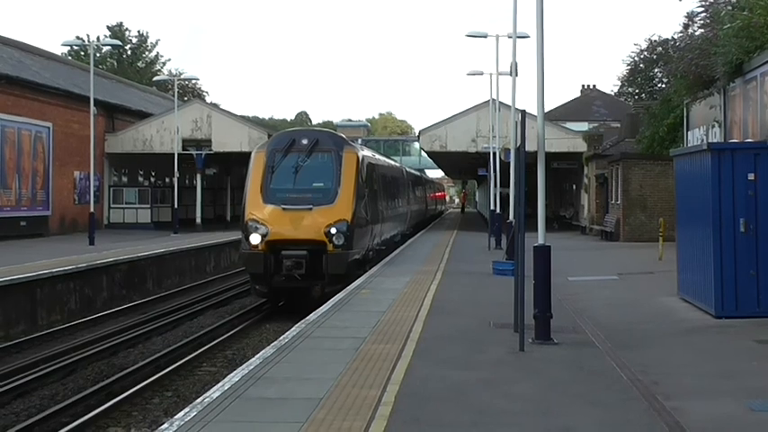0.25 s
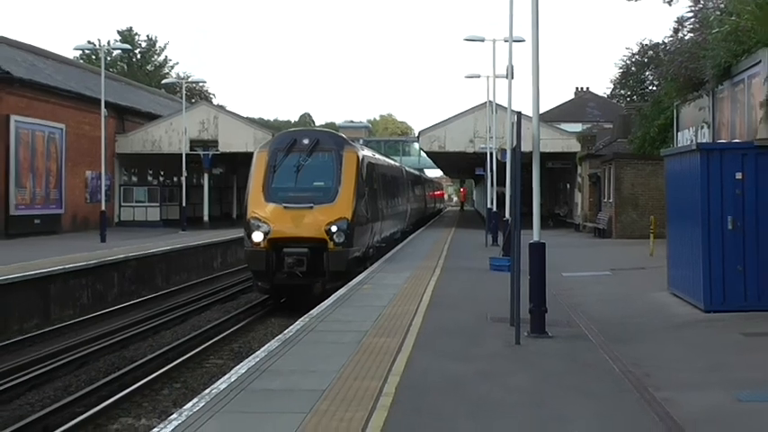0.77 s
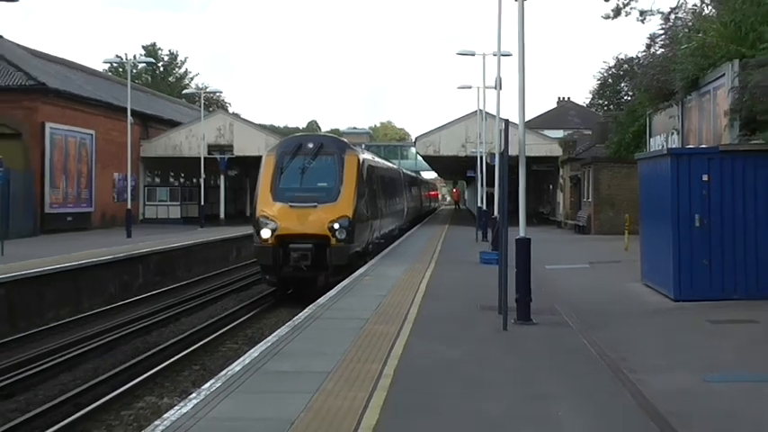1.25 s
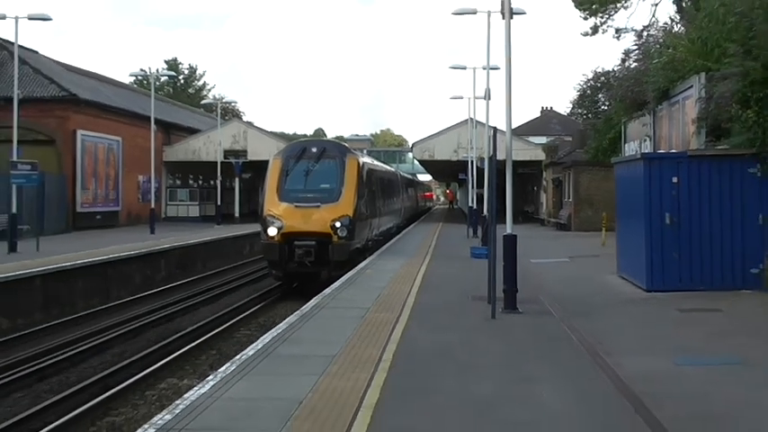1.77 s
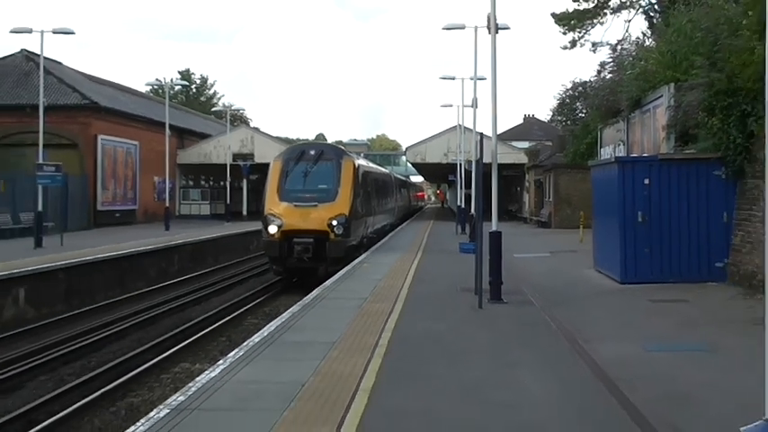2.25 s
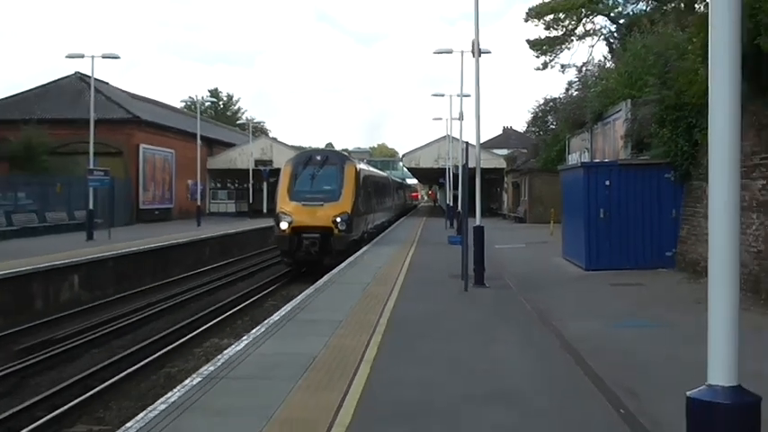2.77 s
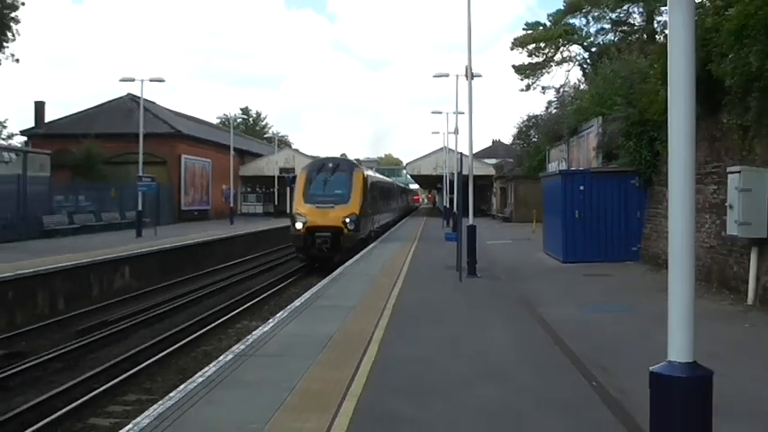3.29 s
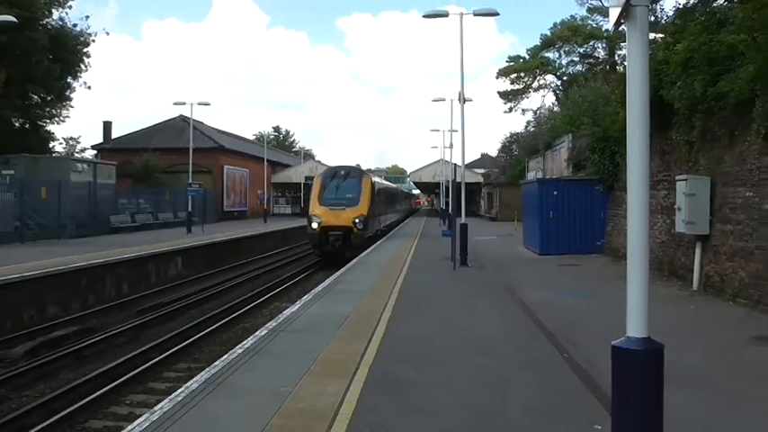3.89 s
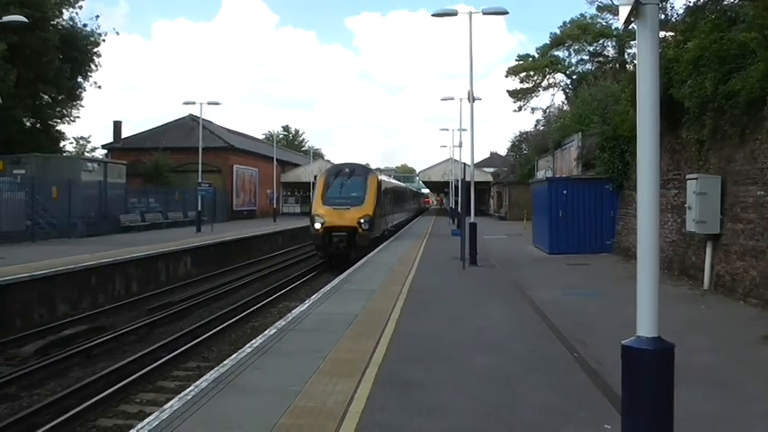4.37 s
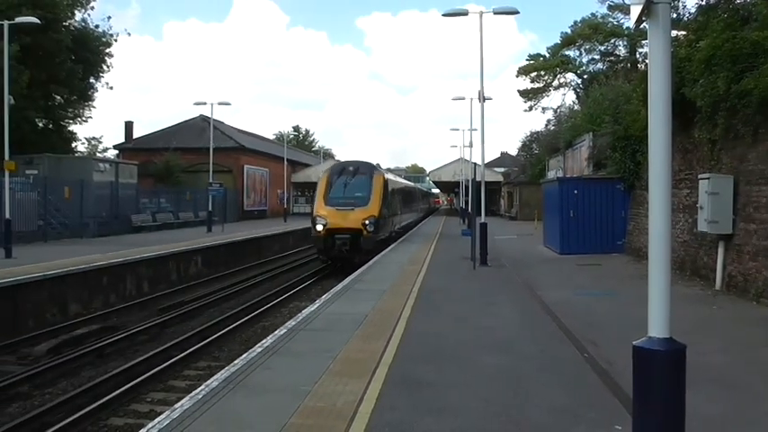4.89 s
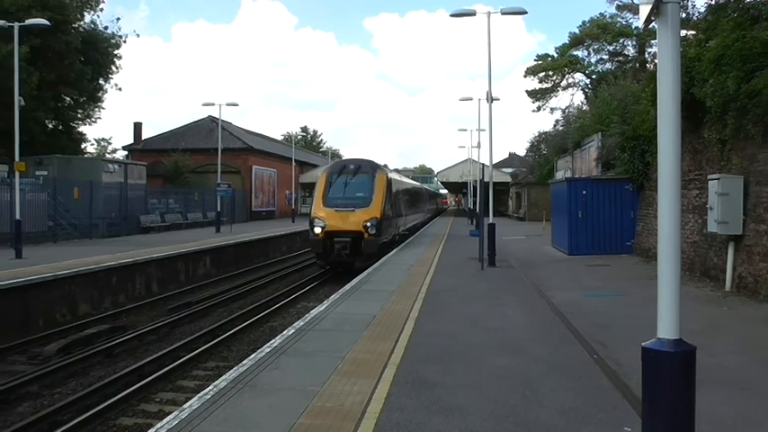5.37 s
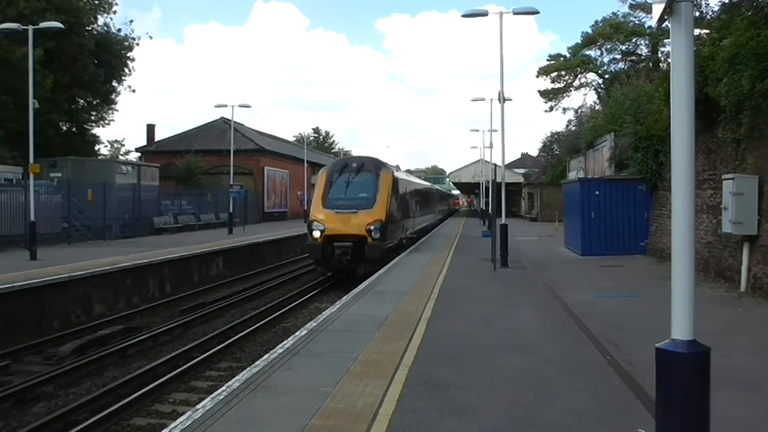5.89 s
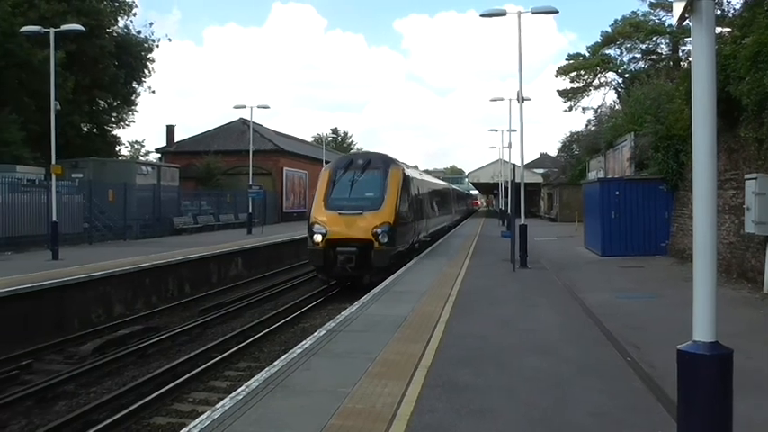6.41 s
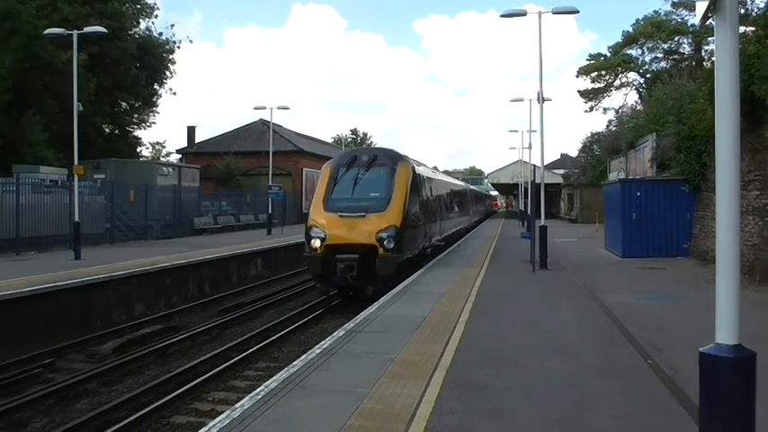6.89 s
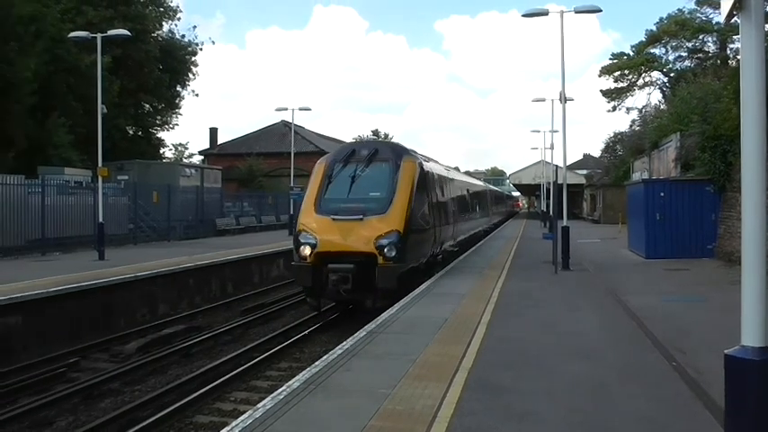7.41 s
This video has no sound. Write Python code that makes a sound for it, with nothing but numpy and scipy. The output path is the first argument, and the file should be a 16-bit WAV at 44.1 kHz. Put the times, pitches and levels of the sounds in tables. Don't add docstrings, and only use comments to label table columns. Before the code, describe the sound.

Outdoors on a station platform, a diesel train of several cars starts with a low engine murmur, steady hollow cooling-fan noise and a thin turbocharger whistle around 4 kHz, with a soft wind rumble. From about 1 s the revs climb smoothly; the firing drone rises in pitch and booms swell and cancel as the cars drift in and out of step. Wind thuds softly near 2.3 s, and gentle compressed-air hisses come and go. A small plastic click from the camera sounds at 3.2 s. Around 3.8 s a second, lower whistle and alternator singing join, with a strong boom near 4 s. A fainter tick comes at 5.2 s. From 6 s the exhaust grows rougher and louder, with broader air hiss and another wind thud near 7 s. The train keeps approaching, roaring loudest as the sound stops at about 7.6 s, before passing.

```python
import sys
import numpy as np
from scipy import signal
from scipy.fft import rfft, irfft, next_fast_len
from scipy.io import wavfile
from scipy.ndimage import uniform_filter1d

SR = 44100
rng = np.random.default_rng(int(sys.argv[2]) if len(sys.argv) > 2 else 0)


def to_linear_factor(level_db):
    exponent = np.asarray(level_db, float) / 20
    return 10 ** exponent


def output_pcm(signal):
    pcm = np.clip(np.atleast_2d(signal).T, -1, 1) * 32767
    wavfile.write(sys.argv[1], SR, np.round(pcm).astype(np.int16))


N = 337365
T = np.arange(N) / SR
PAD = 4096
SIZE = next_fast_len(N + 2 * PAD)
HZ = np.maximum(np.arange(SIZE // 2 + 1) * SR / SIZE, 1)


def curves(table):
    seconds, *columns = np.transpose(table)
    return [np.interp(T, seconds, column) for column in columns]


def response(points, hz=HZ):
    table_hz, table_db = np.array(points).T
    return np.interp(np.log(hz), np.log(table_hz), table_db)


def bumps(modes):
    return sum(db * np.exp(-2 * ((HZ - centre) / width) ** 2) for centre, width, db in modes)


def filtered(x, gain):
    padded = np.pad(x, (PAD, SIZE - N - PAD), "reflect")
    return irfft(rfft(padded) * gain, SIZE)[PAD:PAD + N]


def late(x, seconds):
    return np.pad(x, (int(seconds * SR), 0), "reflect")[:N]


def walk(rate):
    hold = max(int(SR / rate), 1)
    steps = np.repeat(rng.standard_normal(N // hold + 1), hold)
    return 1.46 * uniform_filter1d(uniform_filter1d(steps, hold), hold)[:N]


def swells(rows, rest_db):
    roundness = 1.32
    coarse = T[::64]
    start, length, db = np.transpose(rows)[:, :, None]
    progress = np.clip((coarse - start) / length, 0, 1)
    arch = np.sin(np.pi * progress).clip(0) ** roundness
    power = (to_linear_factor(db) ** 2 * arch).sum(axis=0) + to_linear_factor(rest_db) ** 2
    return np.interp(T, coarse, 10 * np.log10(power))


# frequency in Hz, side level minus mid level in dB.
WIDTH = [(60, -11), (110, -15), (200, -14.5), (370, -18.5), (690, -11), (1260, -11), (2320, -9),
         (4270, -11.5), (7850, -11), (14400, 6)]


def noise(gain):
    mid, side = rng.standard_normal((2, N))
    mid = filtered(mid, gain)
    side = filtered(side, gain * to_linear_factor(response(WIDTH)))
    return np.array([mid, side]) / np.std(mid)


def wavering(hz, db, smear_hz):
    speed = hz * (1 + .004 * walk(8))
    swirl = walk(smear_hz) + 1j * walk(smear_hz)
    tone = np.real(swirl * np.exp(2j * np.pi * np.cumsum(speed) / SR))
    return to_linear_factor(db + 1.2 * walk(5)) * tone


def lines(turns, orders, dbs, wobble):
    out = 0
    for order, db in zip(orders, dbs):
        phase = 2 * np.pi * order * turns + 6.0 / order + wobble * walk(1.6)
        out = out + np.sqrt(2) * to_linear_factor(db) * np.cos(phase)
    return out


# start in seconds, length in seconds, peak level in dB.
WIND_GUSTS = [
    (-.8, 2.2, -48),
    (1.68, .36, -53),
    (2.15, .3, -47),
    (2.4, .55, -46),
    (4, .5, -53),
    (6.95, .4, -45),
    (7.4, .6, -52),
]


def wind():
    band = 1 / (1 + (HZ / 62) ** 6) / (1 + (35 / HZ) ** 4)
    thud = noise(band) * np.array([[1], [2.0]])
    return thud * to_linear_factor(swells(WIND_GUSTS, -66) + 2.0 * walk(7.1))


# time in seconds, peak level in dB.
BODY_TICKS = [
    (3.2462, -23.5),
    (5.1525, -36),
]


def ticks():
    out = np.zeros(N)
    t = np.arange(300) / SR
    for seconds, db in BODY_TICKS:
        start = int(seconds * SR)
        out[start:start + len(t)] = to_linear_factor(db + 6.0) * rng.standard_normal(len(t)) * np.exp(-t / .0015)
    return filtered(out, 1 / (1 + (3000 / HZ) ** 2) / (1 + (HZ / 5500) ** 3))


# start in seconds, length in seconds, peak level in dB.
BLOWS = [
    (1.3, 1.6, -53.5),
    (2.4, 1.43, -49.5),
    (3.7, 1.2, -47),
    (5.7, 1.3, -47.5),
    (6.7, 2, -44),
]


def air():
    centre_hz, width_octaves = 7500, 0.98
    hump = np.exp(-.5 * (np.log2(HZ / centre_hz) / width_octaves) ** 2)
    return noise(to_linear_factor(response(GAS_COLOUR)) * hump) * to_linear_factor(swells(BLOWS, -69))


# frequency in Hz, level in dB per Hz.
COOLING_COLOUR = [(160, -41), (280, 1), (453, 1.5), (632, -13), (839, -9), (1130, -18.5), (1710, -11),
                  (1860, -21), (2430, -24.5), (4800, -22), (8740, -44.5), (13700, -69), (14900, -69.5)]
# frequency in Hz, width in Hz, boost in dB.
DUCT_RINGS = [(372.6, 27.5, 6.5), (855, 56, 5.5), (761, 124, 8.5), (1056, 35, 16.5), (1630, 116, 6),
              (1733, 49, 7), (3230, 610, 6.5), (5020, 47, 8.5), (5370, 51, 14)]
# frequency in Hz, smear in Hz, level in dB.
BLADE_TONES = [(780.5, 40, -51), (851.5, 30, -48.5), (1680, 60, -47.5), (1745, 50, -49), (3340, 300, -62),
               (4690, 120, -63)]


def fans():
    start_m, pull_m_s2 = 29, 0.46
    nearness = start_m / (start_m - pull_m_s2 * T ** 2 / 2)
    colour = to_linear_factor(response(COOLING_COLOUR) + bumps(DUCT_RINGS)) / (1 + (260 / HZ) ** 4)
    cooling = noise(colour) * to_linear_factor(-37 + .5 * walk(1.8))
    blades = sum(wavering(hz, db, smear_hz) for hz, smear_hz, db in BLADE_TONES) * to_linear_factor(-0.95)
    return (cooling + np.array([blades, 0.18 * late(blades, .011)])) * nearness


# start in seconds, length in seconds, peak level in dB.
FAN_BEATS = [(.08, 0.42, -38.5), (1.27, 0.11, -39), (1.7, 0.13, -39.5), (2.05, .15, -36),
             (2.333, 0.16, -32), (2.71, .12, -32.5), (3.45, 0.35, -39), (4.0, 0.14, -37),
             (4.263, 0.12, -34), (4.804, 0.15, -35), (5.16, 0.11, -37), (5.7, 0.23, -37), (6.04, .16, -34),
             (6.697, .25, -37), (7.47, .166, -35)]


def hum():
    pitch_hz, rest_db, flank_s = 382, -53.5, .04
    rows = np.array(FAN_BEATS) + [-flank_s, 2 * flank_s, 0]
    phase = 2 * np.pi * np.cumsum(pitch_hz * (1 + .012 * walk(6))) / SR
    return np.sqrt(2) * to_linear_factor(swells(rows, rest_db) - 2.5) * np.cos(phase)


SLOT_ORDERS = (42, 56, 84)
# start in seconds, length in seconds, peak level in dB.
SLOT_SONGS = [
    [(3.9, 0.38, -40.5), (4.35, 0.42, -41.5), (4.8, 0.22, -44), (5.6, 2.2, -44)],
    [(4.3, 0.98, -46), (5.4, 2.55, -45)],
    [(3.7, 1.1, -55.5), (4.8, 0.99, -54), (6.8, 1.8, -50)],
]
SLOT_REST = (-52.5, -55.5, -67)


def alternator(turns):
    return lines(turns, SLOT_ORDERS, map(swells, SLOT_SONGS, SLOT_REST), 6.06)


# time in seconds, pitch in Hz, level in dB.
NEAR_WHISTLE = [(0, 4250, -57), (.55, 4530, -56), (.9, 4720, -58.5), (1.2, 4900, -64), (1.8, 5500, -65),
                (2.4, 5950, -58.5), (3, 6450, -63), (3.5, 6800, -60), (4.2, 7220, -59), (4.8, 7520, -59.5),
                (5.3, 7750, -65), (7.65, 8600, -66)]
# time in seconds, pitch in Hz, level in dB.
FAR_WHISTLE = [(3.3, 4150, -75), (3.85, 4320, -53), (4.4, 4520, -55), (4.7, 4640, -52), (5.1, 4740, -54),
               (5.4, 4810, -55), (6, 4960, -53), (6.4, 5050, -55), (7.65, 5350, -55)]


def turbochargers():
    near = wavering(*curves(NEAR_WHISTLE), smear_hz=280)
    far = wavering(*curves(FAR_WHISTLE), smear_hz=150)
    return near + far


# time in seconds, crankshaft turns per second in Hz.
CRANK_SPEED = [(0, 18.7), (.66, 20.1), (1.23, 21.05), (1.6, 22), (2.17, 23), (2.8, 24.2), (3.4, 25),
               (4.1, 25.75), (4.75, 26.5), (5.6, 27.4), (6.3, 27.9), (7.1, 28.2), (7.65, 28.5)]


def crankshaft():
    inertia = int(.3 * SR)
    speed = curves(CRANK_SPEED)[0]
    for _ in range(2):
        speed = uniform_filter1d(speed, inertia, mode="nearest")
    return speed


# time in seconds, level over idle in dB.
EFFORT = [(0, -0.5), (.6, 0.8), (1.3, -0.5), (1.9, 1.5), (2.4, 1.5), (2.9, 2), (3.5, 3.5), (4.2, 5),
          (5.1, 6.5), (6.3, 7.5), (6.8, 9), (7.3, 9), (7.55, 10), (7.65, 11)]


def engine_load():
    return curves(EFFORT)[0]


# frequency in Hz, level in dB per Hz.
GAS_COLOUR = [(160, -26), (280, -5), (304, -3), (461, -3), (710, -14.5), (839, -12), (974, -15.5),
              (1400, -17.5), (1710, -16), (1860, -21), (2600, -27.5), (5220, -27.5), (7650, -37),
              (9040, -37), (14900, -69.5)]
GAS_SPLITS = (880, 2320)
# idle level in dB, dB per dB of load,
# dB per octave of turbo speed, depth of puffing from 0 to 1.
GAS_BANDS = [
    (-37.5, 1.2652, 0, 0.01),
    (-38.5, 1.1144, -1, 0),
    (-48, .5, 4.5, 0.04),
]
# frequency in Hz, level in dB per Hz.
RUMBLE_COLOUR = [(12, -58.5), (20, -37.5), (58, -11.5), (101, -15.5), (136, -3), (183, -0.5), (237, 2.5),
                 (320, -11.5), (420, -50), (700, -120)]


def roar(turns, load_db):
    low, high = (1 / (1 + (HZ / split) ** 8) for split in GAS_SPLITS)
    turbo_octaves = np.log2(curves(NEAR_WHISTLE)[0] / NEAR_WHISTLE[0][1])
    out = 0
    for share, (db, growth, boost_db, depth) in zip((low, high - low, 1 - high), GAS_BANDS):
        band = noise(to_linear_factor(response(GAS_COLOUR)) * np.sqrt(share) / (1 + (260 / HZ) ** 4))
        level_db = db + growth * load_db + boost_db * turbo_octaves - 1.5 + 0.71 * walk(4.1)
        puffs = 1 + depth * np.cos(6 * np.pi * turns)
        out = out + band * to_linear_factor(level_db) * puffs
    rumble = noise(to_linear_factor(response(RUMBLE_COLOUR)) / (1 + (HZ / 330) ** 6))
    return out + rumble * to_linear_factor(-32 + 0.65 * load_db)


MAIN_ORDERS = (3, 6, 8, 9)
BRANCH_ORDERS = (5, 7, 10, 12)
# frequency in Hz, level in dB.
SILENCER_PASS = [(30, -31), (60, -20.5), (100, -10.5), (140, -3.5), (200, 2), (260, -8), (330, -10.5),
                 (450, -20)]


def uneven(shaft_hz, turns, load_db):
    out = 0
    for half in range(3, 32):
        order = half / 2
        if order in MAIN_ORDERS + BRANCH_ORDERS:
            continue
        whole_db = 3 * (half % 2 == 0)
        size = to_linear_factor(response(SILENCER_PASS, shaft_hz[::64] * order) + whole_db).repeat(64)[:N]
        phase = np.pi * half * turns + 12.0 / half + 1.2 * rng.standard_normal()
        out = out + size * (.3 + walk(7)) * np.cos(phase)
    return out * to_linear_factor(-42 + .5 * load_db)


# start in seconds, length in seconds, peak level in dB.
ORDER_3 = [
    (-.2, 1.4, -36),
    (.71, 1.18, -35),
    (1.88, .63, -34.5),
    (2.54, .6, -29),
    (2.85, 1.13, -25.5),
    (3.75, 1.72, -25),
    (5.3, .86, -35),
    (6.15, 0.6, -36.5),
    (6.68, 0.52, -33.5),
    (7.2, 0.71, -33),
]
# start in seconds, length in seconds, peak level in dB.
ORDER_6 = [(-.1, 1.2, -31), (.49, 0.71, -35), (.85, 0.8, -30), (1.36, 0.7, -23.5), (1.97, .31, -19.5),
           (2.25, 0.21, -29), (2.43, 0.43, -20), (2.62, 0.473, -21.5), (3.14, 0.51, -25.5),
           (3.59, 0.31, -18), (3.8, 0.55, -13.5), (4.32, .19, -17), (4.45, 0.46, -18), (4.3, 1.17, -15),
           (5.36, 0.3, -20), (5.54, 0.45, -20), (5.98, 0.53, -24.5), (6.24, 0.36, -19.5), (6.5, 0.66, -13),
           (6.85, 0.47, -16), (7.1, 0.69, -12.5)]
# start in seconds, length in seconds, peak level in dB.
ORDER_8 = [(.03, .37, -32), (.44, 0.73, -31.5), (.88, .65, -38), (1.58, .45, -44), (1.97, .3, -27.5),
           (2.31, 0.35, -30.5), (2.58, 0.41, -31), (3.04, .7, -24.5), (3.93, 0.78, -21.5),
           (4.36, 0.54, -21), (4.63, 0.72, -28), (5.28, 0.52, -30), (5.72, 0.72, -29), (6.02, 1, -30),
           (6.79, 0.81, -24)]
# start in seconds, length in seconds, peak level in dB.
ORDER_9 = [(-.17, 0.44, -35.5), (.16, 0.75, -30), (.81, 0.72, -23.5), (1.549, .42, -24), (1.94, 0.34, -20),
           (2.261, .14, -25), (2.39, 0.13, -24.5), (2.54, 0.44, -23), (2.95, .25, -36), (3.19, 1, -29.5),
           (3.85, 0.61, -29.5), (4.4, 0.26, -24), (4.63, .23, -24.5), (4.8, .4, -25), (4.89, 0.89, -21),
           (5.87, 0.45, -24), (6.05, 0.49, -21), (6.57, 0.21, -25.5), (6.77, 0.22, -20.5),
           (6.96, 0.26, -25.5), (7.22, 1.3, -21.5)]
# start in seconds, length in seconds, peak level in dB.
ORDER_5 = [
    (2.58, 0.95, -38),
    (3.67, 0.74, -38),
    (4.14, 1, -41),
    (5.24, 0.95, -33),
    (6.19, 1.08, -29),
    (7.01, 0.85, -26),
]
# start in seconds, length in seconds, peak level in dB.
ORDER_7 = [
    (0.3, 0.39, -42),
    (0.93, 0.57, -39),
    (1.64, 2.47, -40.5),
    (3.93, 0.19, -36),
    (4.09, 0.88, -35),
    (5.19, 0.53, -32),
    (5.67, 0.57, -30.5),
    (6.23, 0.7, -25),
    (6.78, 0.29, -24.5),
    (6.94, 3.0, -23.5),
]
# start in seconds, length in seconds, peak level in dB.
ORDER_10 = [
    (-.06, .44, -37),
    (.36, 0.62, -32),
    (.92, 0.99, -37),
    (2.24, .31, -40),
    (2.61, .43, -32),
    (3.06, 0.4, -28.5),
    (3.2, 2.1, -32),
    (7.3, .9, -38),
]
# start in seconds, length in seconds, peak level in dB.
ORDER_12 = [
    (.03, .55, -34),
    (.6, .25, -33.5),
    (.91, 0.71, -26),
    (1.6, 1.1, -39),
    (2.86, 0.24, -42),
    (6.3, 1, -41),
]
# dB for each main order, then for each branch order.
MAIN_REST = (-55.5, -44.5, -51.5, -41.5)
BRANCH_REST = (-56.5, -47, -51, -45)


def exhaust(shaft_hz, turns, load_db):
    main_db = map(swells, (ORDER_3, ORDER_6, ORDER_8, ORDER_9), MAIN_REST)
    branch_db = map(swells, (ORDER_5, ORDER_7, ORDER_10, ORDER_12), BRANCH_REST)
    boom = lines(turns, MAIN_ORDERS, main_db, .45)
    lumps = lines(turns, BRANCH_ORDERS, branch_db, .6)
    return boom + lumps + uneven(shaft_hz, turns, load_db)


def scene():
    shaft_hz, load_db = crankshaft(), engine_load()
    turns = np.cumsum(shaft_hz) / SR
    pipes = exhaust(shaft_hz, turns, load_db)
    whine = turbochargers() + alternator(turns)
    mid, side = wind() + air() + fans() + roar(turns, load_db)
    mid = mid + ticks() + hum() + whine + pipes
    side = side + to_linear_factor(-32.5) * late(pipes, .066) + to_linear_factor(-12) * late(whine, 0.0076)
    return np.array([mid + side, mid - side])


# frequency in Hz, level in dB per Hz.
HISS_COLOUR = [(6000, -25.5), (10000, -12), (12000, -3.5), (15000, -6.5)]


def microphone_hiss():
    hiss = [filtered(port, to_linear_factor(response(HISS_COLOUR))) for port in rng.standard_normal((2, N))]
    hiss = np.array([port / np.sqrt(np.mean(port ** 2)) for port in hiss])
    return hiss * to_linear_factor(-66.5 + .4 * engine_load() + .5 * walk(3))


# frequency in Hz, width in Hz, change in dB.
HOUSING = [(2200, 176, 3), (2540, 430, -2), (7820, 460, -3.5), (8700, 3400, 3.5), (10430, 280, -5.5),
           (11500, 500, -2)]
# frequency in Hz, left level minus right level in dB.
PORT_DIFFERENCE = [(60, -0.5), (110, -0.5), (200, -0.5), (370, -0.5), (690, -0.5), (1260, 1.0), (2320, 1.5),
                   (4270, 0.0), (7850, -0.5), (14400, 0.0)]


def microphone_ports(dry):
    housing_db, tilt_db = bumps(HOUSING), response(PORT_DIFFERENCE) / 2
    left = filtered(dry[0], to_linear_factor(housing_db + tilt_db))
    right = filtered(dry[1], to_linear_factor(housing_db - tilt_db))
    return np.tanh(.8 * np.array([left, right])) / .8


def band_limit(x):
    return signal.sosfilt(signal.butter(12, 15030, fs=SR, output="sos"), x)


def record(dry):
    ports = microphone_ports(dry) + microphone_hiss()
    top_cut = signal.ellip(8, .2, 70, 15100, fs=SR, output="sos")
    fade = np.clip((T[-1] - T) / .002, 0, 1)
    mix = signal.sosfilt(top_cut, ports) * fade
    return band_limit(mix)


dry = scene()
out = record(dry)
output_pcm(out)
```